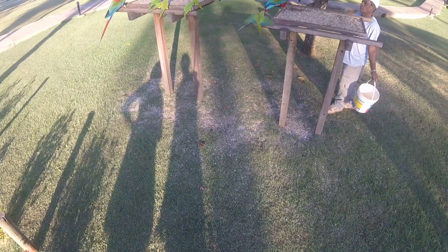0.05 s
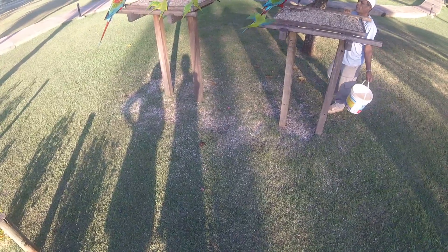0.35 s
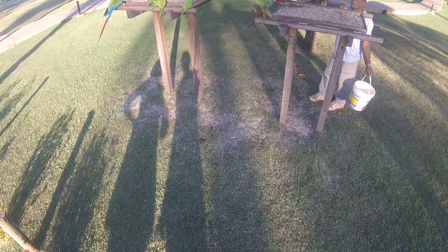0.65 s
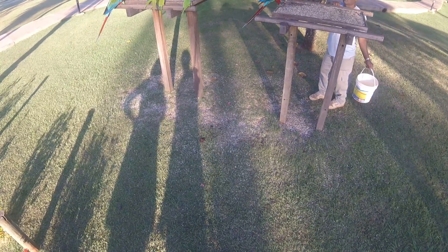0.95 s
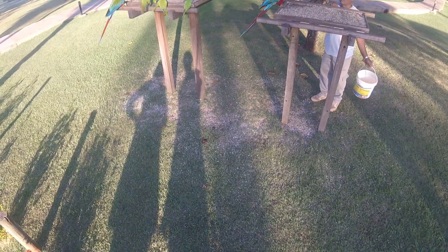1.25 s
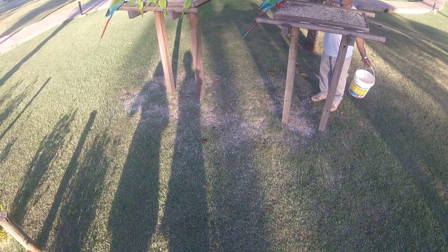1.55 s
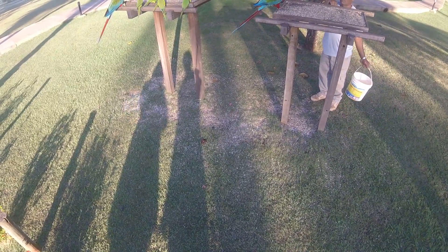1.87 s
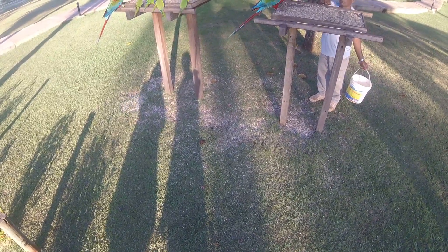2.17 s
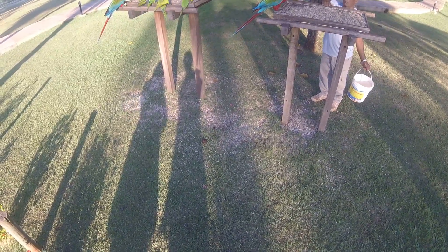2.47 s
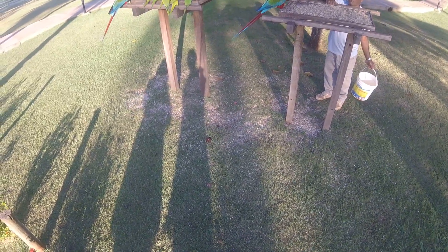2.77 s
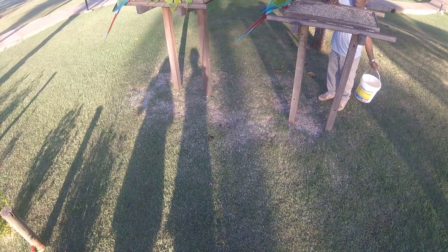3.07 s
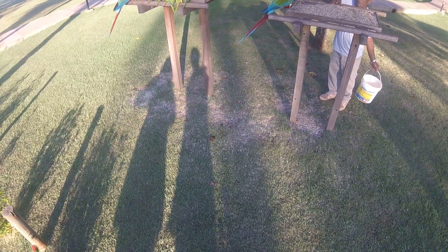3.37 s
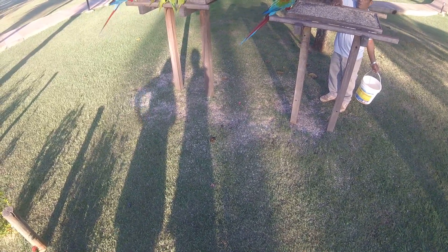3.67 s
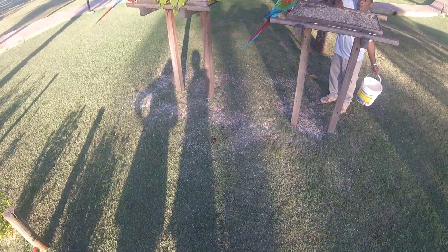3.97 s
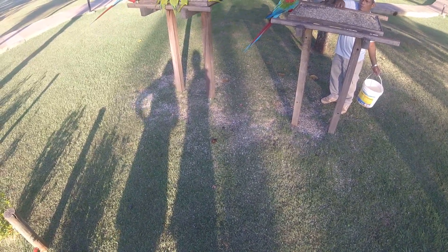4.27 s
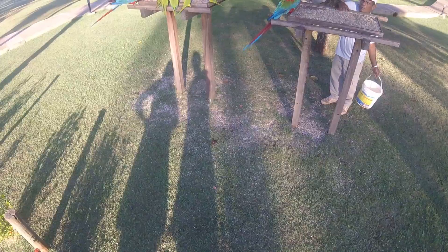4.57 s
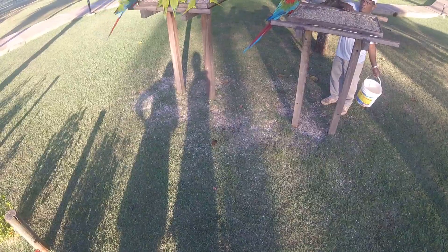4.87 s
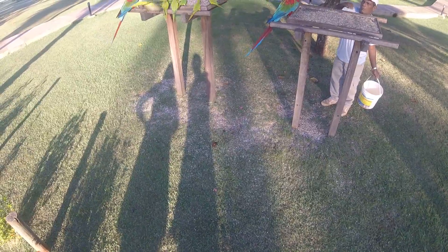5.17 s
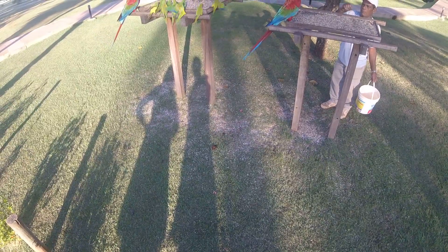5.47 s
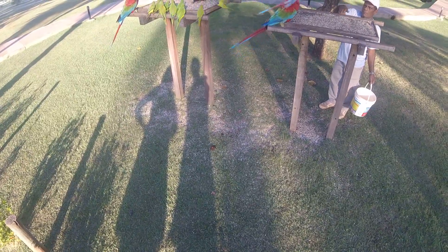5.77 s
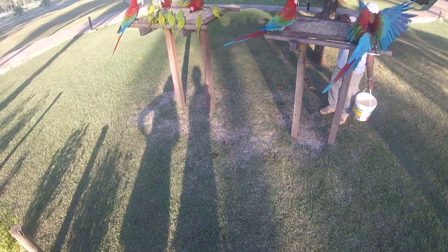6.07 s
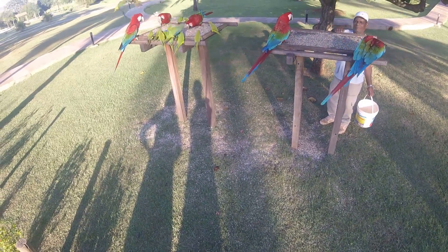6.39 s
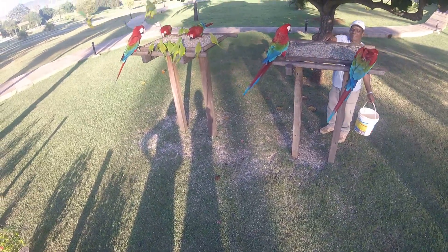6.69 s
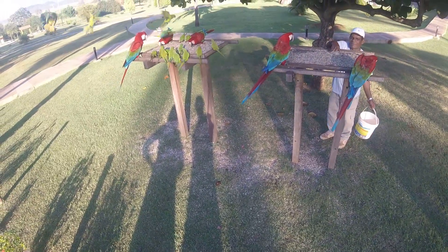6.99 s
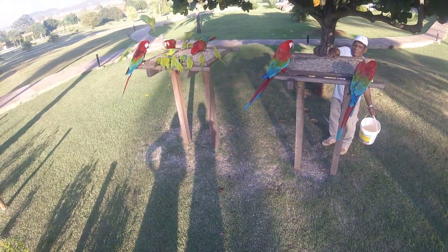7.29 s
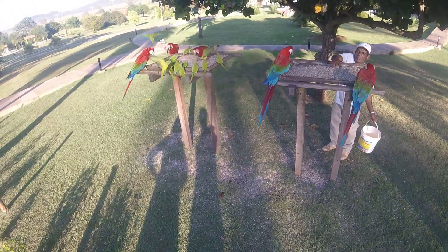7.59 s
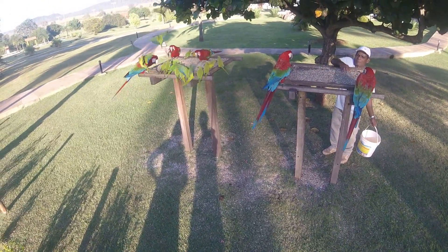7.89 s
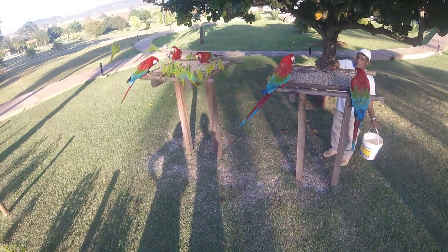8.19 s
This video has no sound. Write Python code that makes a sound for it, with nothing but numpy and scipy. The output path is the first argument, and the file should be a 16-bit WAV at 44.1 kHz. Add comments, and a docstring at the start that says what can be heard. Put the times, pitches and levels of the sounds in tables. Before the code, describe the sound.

On an open lawn, parakeets call throughout in short, fast warbles, rattling trills, harsh screeches and chirps that echo lightly off the trees. At about 0.3 seconds a macaw close to the microphone gives a short, raspy squawk that jumps up in pitch and breaks. Thin gliding whistles come in the first two seconds, and rising yelps at about 2 and 2.8 seconds. The calls grow busier from 3 to 5 seconds, with a sharp, high chirp near 4.4. Farther macaws croak low and dull around 3.5, 4.6 and 7.3 seconds. Four faint, soft wingbeats pass around 6 seconds, followed by more trills and a bright screech at 6.7. At 8 seconds the close macaw squawks again, the loudest sound of all. Underneath run distant flock chatter, a faint motor hum and a steady low outdoor rumble with light hiss.

```python
"""An open lawn at feeding time, with a flock of parakeets warbling, rattling and screeching in the trees.
Close to the microphone a macaw on the feeder squawks twice; others grumble farther off, and one flaps in
to land. The calls are membrane pulses and chopped breath shaped by a throat, with a few thin whistles
among them, and they reflect off ground, feeders and trees. Behind them lie the chatter of more birds,
a distant motor hum and low outdoor rumble."""
import sys
import numpy as np
from scipy import signal
from scipy.fft import rfft, irfft, next_fast_len
from scipy.io import wavfile
from scipy.ndimage import uniform_filter1d

SR = 44100
rng = np.random.default_rng(int(sys.argv[2]) if len(sys.argv) > 2 else 0)


def master_out(mix):
    """Clip the mix to full scale and print it as 16-bit PCM to the path in sys.argv[1]."""
    frames = np.transpose(np.atleast_2d(mix))
    ceiling = np.clip(frames, -1, 1)
    pcm = np.round(ceiling * 32767).astype(np.int16)
    wavfile.write(sys.argv[1], SR, pcm)


N = 367794
TOP_HZ = 13700  # upper limit of the voices' harmonics and of the microphone

# A parakeet's throat resonances in three kinds of call. Each row: frequency in Hz, gain in dB.
WARBLE_THROAT = [(500, -20), (1100, -20), (1600, -21), (2200, -1), (3300, -1.5), (4400, 7), (5400, -13.5),
                 (6550, -4), (7600, -20.5), (10000, -24.5), (12000, -48)]
RATTLE_THROAT = [(600, -27.5), (1400, -15), (2100, -6.5), (2700, -3), (3450, -1), (4100, 1), (4900, -9),
                 (5800, -15), (6700, -9.5), (7600, -17.5), (10400, -27), (11800, -57.5)]
CHIRP_THROAT = [(700, -17), (1500, -20.5), (2200, -3), (3000, 6), (3700, -4), (4450, 5), (5300, -3),
                (6200, -2), (7500, -15), (10000, -26), (12000, -43)]


def parakeets():
    """The near flock; trills and harsh calls come from different perches, each with its reflections."""
    # Warbled and rattled trills. Each row: start in seconds, syllable count, syllable period in seconds,
    # loudest point 0-1, level in dB, swell in dB, pitch in Hz, roughness 0-1, throat focus in dB.
    warbles = [(0.189, 10, .0295, .48, -31, 24, 1078, .2, -4), (1.0, 6, .025, .3, -40.3, 5, 1085, .35, -3),
               (2.67, 4, .024, .3, -52, 4, 1100, .1, 8), (3.518, 5, .0218, .05, -30, 8, 1072, .2, -5),
               (3.783, 12, .0245, .4, -38.3, 12, 1098, .27, -1.5),
               (4.597, 5, .029, .5, -41.3, 1, 1040, .3, -8), (6.066, 6, .0262, .25, -32.3, 7, 1092, .14, 5),
               (6.338, 4, .0228, .4, -35, 5, 1135, .5, -1), (6.765, 5, .023, .43, -27, 20, 1015, .44, -1.5)]
    rattles = [(1.245, 13, .0227, .6, -32, 26, 660, .43, -1), (1.553, 4, .0225, .4, -46, 3, 705, .3, 0),
               (3.0495, 6, .0249, .5, -26.8, 48, 665, .17, 0),
               (5.333, 7, .025, .58, -31.7, 36, 575, .45, 0),
               (7.436, 13, .021, .6, -36.3, 12, 690, .45, -1.5)]
    # Harsh calls and thin, high ones. Each row: peak time, rise and fall in seconds, level in dB,
    # pitch in Hz, glide in octaves per second, brightness in dB, roughness 0-1.
    screeches = [(0.13, .1, .16, -42, 1100, .1, -3, .64), (0.949, .12, .052, -33, 690, 2.6, -1.5, .65),
                 (1.2, .05, .061, -45, 1075, -1.4, 6, .64), (2.17, .037, .063, -36.3, 1048, -1.7, -3, .45),
                 (2.489, .12, .082, -41.3, 717, -1.4, -9, .6), (3.476, .08, .06, -35.8, 615, 2.5, -14, .8),
                 (3.77, .036, .031, -44, 1130, 5, -5, .54), (4.19, .049, .049, -45.5, 853, .1, -8, .36),
                 (4.32, .071, .043, -43, 800, .1, -1, .53), (4.43, .12, .081, -36.5, 1080, .3, 0, .43),
                 (4.531, .056, .073, -38.5, 1075, 1.2, -5, .56),
                 (4.845, .045, .026, -42.3, 850, 1.8, -6, .5), (5.65, .16, .15, -43.5, 1110, -.4, 6, .55),
                 (6.028, .04, .028, -37.3, 1112, 3, 4, .54), (6.725, .05, .027, -26.2, 592, 6, 5, .38),
                 (8.083, .044, .032, -30, 980, -6, 10, .6)]
    chirps = [(0.62, .093, .05, -37, 1600, -1, -6, .7), (2.27, .05, .11, -43.3, 1440, -.5, 0, .65),
              (4.379, .023, .023, -33, 2440, 4, 14, .25), (4.466, .045, .041, -35.5, 1620, -3.6, 9, .37),
              (4.93, .065, .035, -45, 1290, -1.7, -7, .74), (5.241, .069, .076, -44, 1690, -1.2, 6, .35),
              (7.045, .072, .1, -41.3, 1480, .8, 8, .38), (7.185, .05, .089, -48, 1450, -.8, 7, .5),
              (8.305, .063, .043, -40, 1552, 1.1, 10, .48)]
    warbling = trills(warbles, WARBLE_THROAT, bend=.083, slide=-.016, taper=.23, gap=.11,
                      waver=.015, climb=-.015, pitch_per_db=.001)
    rattling = trills(rattles, RATTLE_THROAT, bend=-.05, slide=.01, taper=.32, gap=.1,
                      waver=.022, climb=.18, pitch_per_db=.014)
    screeching = yelps()
    for row in screeches:
        add(screeching, *screech(RATTLE_THROAT, *row))
    for row in chirps:
        add(screeching, *screech(CHIRP_THROAT, *row))
    return (among_trees(warbling, scatter_db=-12.5, near_db=-9.5, echo_db=-33)
            + among_trees(rattling, scatter_db=-14.5, near_db=-7, echo_db=-50)
            + among_trees(screeching, scatter_db=-11, near_db=-9, echo_db=-24))


def trills(rows, throat, bend, slide, taper, gap, waver, climb, pitch_per_db):
    """Runs of about forty syllables a second that swell and fade in one breath; pitch follows effort."""
    # The resonance a bird lifts as it presses its voice. Each row: frequency in Hz, share of the focus.
    focus = [(3400, 0), (4300, 1), (5400, 0.24)]
    scatter_db, detune, rough_scatter = 3.0, .045, .35  # chance between syllables of a fully rough trill
    out = np.zeros(N)
    for start, count, period, crest, db, swell_db, hz, rough, focus_db in rows:
        pressed = [(f, level + focus_db * value_at(focus, f)) for f, level in throat]
        u = np.linspace(-1, 1, int(period * (1 - gap) * SR))  # one syllable, short of its closure
        gate = unit_rms(signal.windows.tukey(len(u), taper))
        for k, (louder, higher, hoarser) in enumerate(noise((count, 3))):
            past_crest = k / (count - 1) - crest
            effort_db = -swell_db * past_crest ** 2
            centre_hz = hz * (1 + climb * past_crest + pitch_per_db * effort_db + detune * rough * higher)
            scoop = bend * (u ** 2 - 1 / 4)  # a negative bend arches instead
            pitch = centre_hz * (1 + scoop + slide * u + waver * wander(len(u), 109.6))
            voice = syrinx(pitch, rough * (1 + rough_scatter * hoarser), pressed,
                           jitter=.07, jitter_hz=489, rasp=1.6, vary_db=1.9)
            gain = amp(db + effort_db + scatter_db * rough * louder)
            add(out, start + k * period, gain * gate * voice)
    return out


def screech(throat, peak, rise, fall, db, hz, glide, bright_db, rough, droop=.04):
    """Start time and sound of a parakeet's arched call; it flutters when harsh and cracks in pitch."""
    # Upper resonances lifted by a wide-open beak. Each row: frequency in Hz, share of the brightness.
    open_beak = [(2500, 0.045), (4200, 0.32), (5600, 0.51)]
    voicing_db, least_swell_db = -44, 9.5  # the call swells from the level where the voice starts
    pitch, gain = arch(rise, fall, hz, glide, droop, edge_db=min(voicing_db - db, -least_swell_db))
    size = len(pitch)
    flutter = amp((.4 + 3.1 * rough) * wander(size, 131))
    brightened = [(f, level + bright_db * value_at(open_beak, f)) for f, level in throat]
    pitch = pitch * (1 + .02 * membrane_slips(size) + .025 * rough * wander(size, 130))
    voice = syrinx(pitch, rough, brightened, jitter=.0678, jitter_hz=521.4, rasp=1.0, vary_db=2)
    return peak - rise, amp(db) * gain * flutter * voice


def yelps(overlap_s=.009, rasp_db=-2, rasp_crest=.65, note_crest=.4):
    """A rising rasp, then the voice breaks upward into a thin note that sinks."""
    # Each row: break time, rasp length and note length in seconds, note level in dB,
    # rasp pitch and note pitch in Hz, note roughness 0-1, brightness in dB.
    calls = [(2.074, .072, .09, -29.8, 1014, 1420, .75, -6), (2.818, .053, .09, -33.8, 900, 1490, .2, 6),
             (4.99, .046, .1, -35.2, 844, 1520, .54, 8), (6.302, .09, .05, -35.5, 1101, 1410, .55, 1),
             (7.345, .047, .087, -36.7, 850, 1520, .37, -1)]
    out = np.zeros(N)
    for break_s, rasp_s, note_s, db, rasp_hz, note_hz, rough, bright_db in calls:
        rise, fall = rasp_crest * rasp_s, (1 - rasp_crest) * rasp_s
        add(out, *screech(RATTLE_THROAT, break_s - fall, rise, fall + overlap_s, db + rasp_db, rasp_hz,
                          glide=2.5, bright_db=bright_db, rough=.57, droop=.06))
        rise, fall = note_crest * note_s, (1 - note_crest) * note_s
        add(out, *screech(CHIRP_THROAT, break_s + rise, rise + overlap_s, fall, db, note_hz,
                          glide=-2.1, bright_db=bright_db, rough=rough, droop=0))
    return out


def close_macaw(break_rough=2.2):
    """Two squawks near the microphone: a rasp jumps up into a clearer note and breaks as it falls."""
    # The course of each squawk. Each row: time in seconds, level in dB, pitch in Hz.
    first_squawk = [(0.17, -46, 447.4), (0.18, -46, 490.0), (0.21, -37, 519.8), (0.222, -30, 587.5),
                    (0.274, -24, 888.8), (0.29, -28, 603.5), (0.305, -35, 528.1)]
    loud_squawk = [(7.905, -53, 370.0), (7.949, -33, 545.0), (7.977, -25, 611.1), (7.979, -23, 634.0),
                   (7.987, -20, 786.0), (7.989, -20, 808.9), (8.001, -18, 851.2), (8.027, -16, 851.3),
                   (8.041, -19, 726.9), (8.058, -30, 643.9)]
    # The macaw's throat resonances. Each row: frequency in Hz, gain in dB.
    throat = [(300, -15), (580, -8), (850, -9.5), (1170, 4.5), (1700, -0.5), (2550, 2.5), (3400, -1.5),
              (4250, -4), (5100, -7.5), (6000, -16), (6800, -17), (8000, -27), (10500, -34), (12000, -71)]
    # The voice clears with effort. Each row: level in dB, roughness 0-1.
    clearing = [(-40, .6), (-27, .2), (-17, .05)]
    out = np.zeros(N)
    for squawk in (first_squawk, loud_squawk):
        times, levels, pitches = np.transpose(squawk)
        t = np.arange(times[0], times[-1], 1 / SR)
        db, hz = np.interp(t, times, levels), np.interp(t, times, pitches)
        pitch_lost = 1 - hz / np.maximum.accumulate(hz)
        rough = np.minimum(np.interp(db, *np.transpose(clearing)) + break_rough * pitch_lost, .65)
        cry = syrinx(hz, rough, throat, jitter=.11, jitter_hz=595.7, rasp=.76, vary_db=-2)
        add(out, times[0], amp(db) * cry * signal.windows.tukey(len(t), .05))
    return out


def syrinx(hz, rough, throat, jitter=.075, jitter_hz=520, rasp=.75, vary_db=4.0):
    """Jittered membrane pulses and air chopped by each cycle, through a throat that varies each time."""
    size, rough = len(hz), np.clip(rough, 0, 1)
    cycles = np.cumsum(hz * (1 + jitter * rough * wander(size, jitter_hz))) / SR
    throat = [(f, db + vary_db * z) for (f, db), z in zip(throat, noise(len(throat)))]
    tone = np.zeros(size)
    for k in range(1, int(TOP_HZ / hz.min()) + 1):
        strength = amp(value_at(throat, k * hz)) * (k * hz < TOP_HZ)
        tone += strength * np.cos(2 * np.pi * k * cycles + .2476 * k * k)  # phases spread the pulse
    tone *= 1 + .5 * rough * wander(size, 700)
    tone /= np.sqrt(abs(uniform_filter1d(tone ** 2, size=600)) + 1e-9)  # even out the level
    puffs = .15 + np.exp(-(cycles % 1) / .083)
    air = unit_rms(colour(noise(size) * puffs, throat))
    air_share = np.clip(rasp * rough ** 2 + .024, 0, 1)
    return np.sqrt(1 - air_share) * tone + np.sqrt(air_share) * air


def arch(rise, fall, hz, glide, droop, edge_db):
    """Pitch and gain of a call that swells and dies away; the pitch glides and droops at both ends."""
    t = np.arange(-rise, fall, 1 / SR)
    from_peak = abs(np.where(t < 0, t / rise, t / fall))
    gain = amp(edge_db * from_peak ** 1.5) * signal.windows.tukey(len(t), .25)
    pitch = hz * 2 ** (glide * t) * (1 - droop * from_peak ** 1.4)
    return pitch, gain


def membrane_slips(size):
    """A value that jumps at random about every thirty milliseconds, as the membranes slip."""
    slips = np.cumsum(noise(size) > 3.15)
    return uniform_filter1d(noise(slips[-1] + 1)[slips], size=160)


def whistles():
    """Thin gliding notes that quaver in pitch and strength; the last two are no notes of their own but brief
    flares of the calls' overtones ringing near 6.6 kHz at 4.4 s."""
    # Each row: peak time, rise and fall in seconds, level in dB, pitch in Hz, glide in octaves per second.
    notes = [(0.17, .17, .06, -47.5, 3500, -2.6), (0.575, .07, .029, -47.5, 2370, .8),
             (0.623, .012, .025, -41.5, 3350, -8), (0.71, .05, .074, -50, 4880, .1),
             (0.83, .035, .033, -47.5, 3000, 4.5), (1.76, .055, .045, -53, 2420, -3.9),
             (1.93, .025, .068, -53, 5450, .6), (1.965, .015, .061, -48, 4350, -2.5),
             (4.412, .014, .01, -30, 6640, -5), (4.465, .015, .0094, -37, 6580, -3)]
    out = np.zeros(N)
    for peak, rise, fall, db, hz, glide in notes:
        pitch, gain = arch(rise, fall, hz, glide, droop=.015, edge_db=-5)
        pitch = pitch * (1 + .009 * wander(len(pitch), 300))
        quaver = amp(3 * wander(len(pitch), 110))
        tone = np.sin(2 * np.pi * np.cumsum(pitch) / SR)
        add(out, peak - rise, amp(db) * gain * unit_rms(quaver * tone))
    return out


def far_macaws():
    """Low, dull croaks of macaws farther from the microphone."""
    # Each row: peak time, rise and fall in seconds, level in dB, pitch in Hz,
    # glide in octaves per second, roughness 0-1.
    grumbles = [(3.46, .13, .059, -38.5, 392, 2.8, .42), (4.579, .15, .092, -50.5, 398, .4, .25),
                (7.295, .081, .1, -45.5, 365, .4, .55), (7.411, .038, .04, -50.5, 368, .5, .36)]
    # Their throats, heard from a distance. Each row: frequency in Hz, gain in dB.
    throat = [(200, -28), (400, -2.5), (750, -5), (1150, 1), (1550, -5), (2000, -18), (4000, -30),
              (9000, -47)]
    out = np.zeros(N)
    for peak, rise, fall, db, hz, glide, rough in grumbles:
        pitch, gain = arch(rise, fall, hz, glide, droop=.055, edge_db=-19)
        croak = syrinx(pitch, rough, throat, jitter=.17, jitter_hz=294.2, rasp=1.5)
        add(out, peak - rise, amp(db) * gain * croak)
    return out


def wings(width_s=.047):
    """A macaw comes in to land; each downstroke pushes a soft puff of air."""
    # Each row: time of the downstroke in seconds, level in dB.
    wingbeats = [(5.78, -51.5), (5.88, -49), (5.99, -48.5), (6.1, -52.5)]
    puff_spectrum = [(80, -15), (240, -.5), (500, -7), (1100, -11.5), (3000, -7.5), (9000, -29)]
    t = np.arange(N) / SR
    strokes = sum(amp(db) * np.exp(-((t - s) / width_s) ** 2) for s, db in wingbeats)
    return strokes * unit_rms(colour(noise(N), puff_spectrum))


def far_flock(count=50, syllable_hz=40):
    """More parakeets chattering at random deep in the trees."""
    out = np.zeros(N)
    for k, (when, length, loud, high, slide) in enumerate(rng.random((count, 5))):
        start = (k + when) * N / SR / count
        half_s = .0508 + .0576 * length
        pitch, gain = arch(half_s, half_s, hz=1020 + 130 * high, glide=.8 - 1.1 * slide,
                           droop=-.085, edge_db=-19.5)
        syllables = np.sin(2 * np.pi * syllable_hz * np.arange(len(pitch)) / SR)
        voice = syrinx(pitch * (1 - .03 * syllables), rough=.32, throat=WARBLE_THROAT)
        add(out, start, amp(-61 + 4.4 * loud) * gain * (1 + .5 * syllables) * voice)
    return out


def motor_hum(drift_hz=3.527, waver_db=3.3):
    """A distant motor whose low tones each waver in pitch and strength."""
    # Each row: frequency in Hz, rms level in dB around which the tone wavers.
    tones = [(49, -58.5), (73, -52), (92, -59.5), (120, -54.5)]
    out = np.zeros(N)
    for hz, db in tones:
        gain = amp(db + waver_db * wander(N, 14))
        cycles = np.cumsum(hz + drift_hz * wander(N, 14)) / SR
        out += gain * unit_rms(np.sin(2 * np.pi * cycles))
    return out


def outdoor_air(level_db=-44.55, waver_db=.27):
    """Low rumble and faint hiss over the lawn, almost steady."""
    # Each row: frequency in Hz, relative noise density in dB.
    spectrum = [(20, 5), (42, 0.5), (54, -2.5), (105, -7.5), (140, -9.5), (200, -16.5), (550, -20),
                (1400, -24), (2500, -24), (4400, -25), (5400, -28), (6550, -26.5), (7300, -32.5),
                (10000, -43.5), (13500, -51.5)]
    return amp(level_db) * unit_rms(colour(noise(N), spectrum)) * amp(waver_db * wander(N, 8))


def among_trees(direct, scatter_db, near_db, echo_db, near_s=.003, echo_s=.15):
    """The direct sound, quick reflections off ground and feeders, scatter from trees and one far echo."""
    # The ring of the trees and shelters. Each row: frequency in Hz, seconds to fall by 60 dB.
    ring_times = [(300, 0.19), (1500, 0.44), (4000, 0.25), (10000, 0.25)]
    taps = noise(SR) * (rng.random(SR) < 2500 / SR) * (np.arange(SR) > .012 * SR)  # sparse, after 12 ms
    hz, t, spectra = signal.stft(taps, SR, nperseg=256)
    decay = amp(-60 * t / value_at(ring_times, hz)[:, None])
    tail = signal.istft(spectra * decay, SR, nperseg=256)[1]
    response = amp(scatter_db) * tail / np.linalg.norm(tail)
    for delay, db in ((near_s, near_db), (echo_s, echo_db)):
        cluster = noise(700) * np.exp(-np.linspace(0, 2, 700)) * (rng.random(700) < .04)
        add(response, delay, amp(db) * cluster / np.linalg.norm(cluster))
    return direct + signal.fftconvolve(direct, response)[:N]


def amp(db):
    return 10 ** (np.asarray(db) / 20)


def unit_rms(x):
    return x / np.sqrt(np.mean(x ** 2) + 1e-20)


def value_at(points, hz):
    """Interpolates (Hz, value) points on a log-frequency axis."""
    f, value = np.transpose(points)
    return np.interp(np.log(hz + 1), np.log(f + 1), value)


def add(mix, start_s, sound):
    part = mix[max(round(start_s * SR), 0):][:len(sound)]
    part += sound[:len(part)]


def noise(size):
    """White noise from a stream of its own."""
    return np.random.default_rng(rng.integers(1 << 30)).standard_normal(size)


def colour(x, points):
    """Filters x by a spectrum of (Hz, dB) points."""
    size = next_fast_len(len(x) + 512)
    gain = amp(value_at(points, np.fft.rfftfreq(size, 1 / SR)))
    return irfft(rfft(x, size) * gain, size)[:len(x)]


def wander(size, hz):
    """A smooth random curve of rms near 1, changing hz times a second."""
    at = np.arange(size) * hz / SR
    knots = noise(int(at[-1]) + 2)
    return np.interp(at, np.arange(len(knots)), knots)


def scene():
    """The lawn from one microphone: the farther the bird, the more of it is scatter from the trees."""
    close, middle, far = close_macaw(), whistles() + far_macaws(), far_flock()
    close = among_trees(close, scatter_db=-18.5, near_db=-10, echo_db=-28.5)
    middle = among_trees(middle, scatter_db=-10.5, near_db=-10, echo_db=-34)
    far = among_trees(far, scatter_db=-1.5, near_db=-11, echo_db=-16)
    return (parakeets() + close + middle + far + wings() + outdoor_air() + motor_hum())[None]


def record(dry, housing_hz=6540, housing_q=40, ring_gain=.4):
    """The housing around the microphone rings faintly at one high pitch; the top treble is cut off."""
    ring = signal.lfilter(*signal.iirpeak(housing_hz, housing_q, SR), dry)
    lowpass = signal.firwin(511, TOP_HZ, window=("kaiser", 9), fs=SR)
    return signal.oaconvolve(dry + ring_gain * ring, lowpass[None], "same")


dry = scene()
out = record(dry)
master_out(out)
```